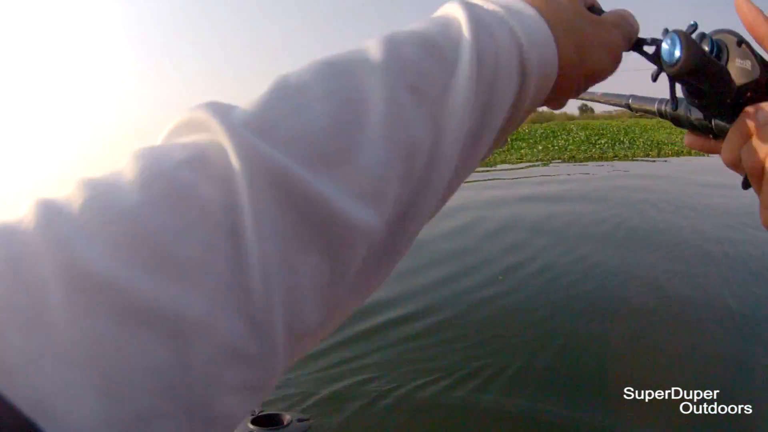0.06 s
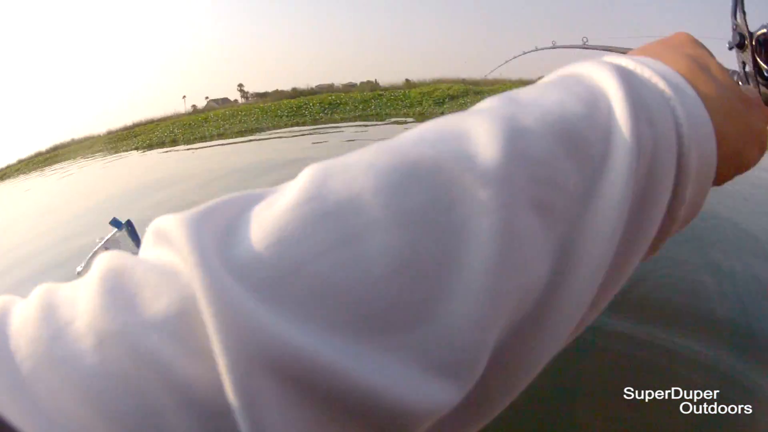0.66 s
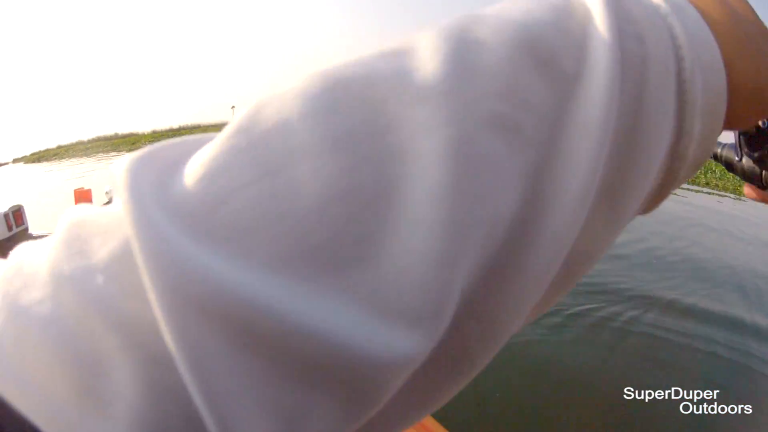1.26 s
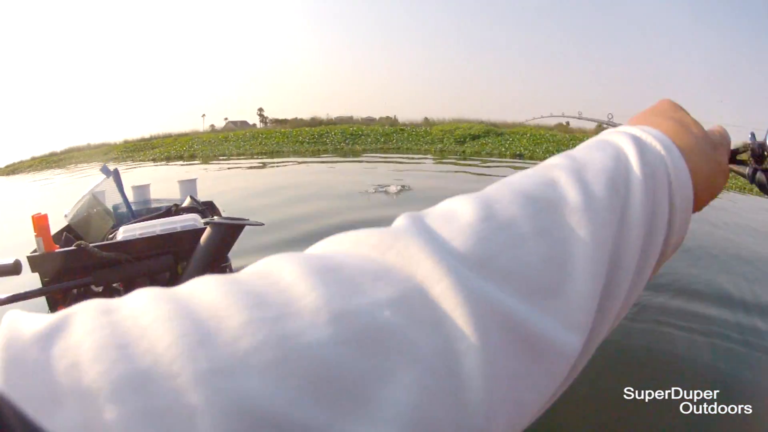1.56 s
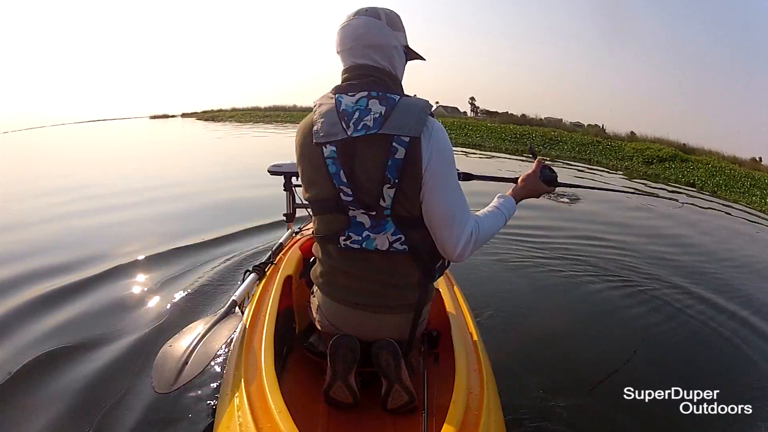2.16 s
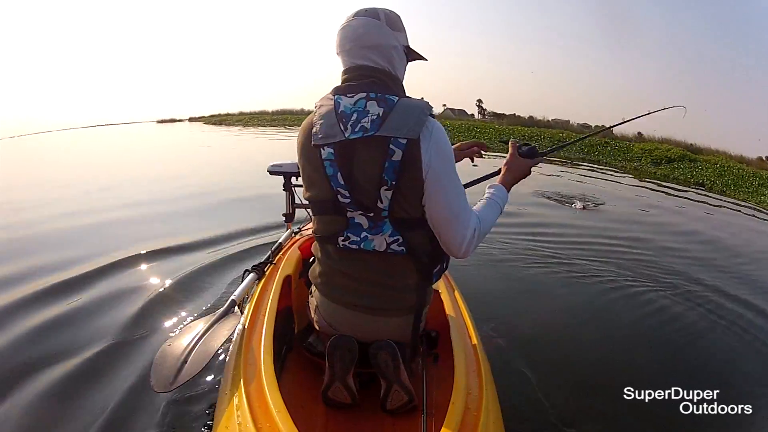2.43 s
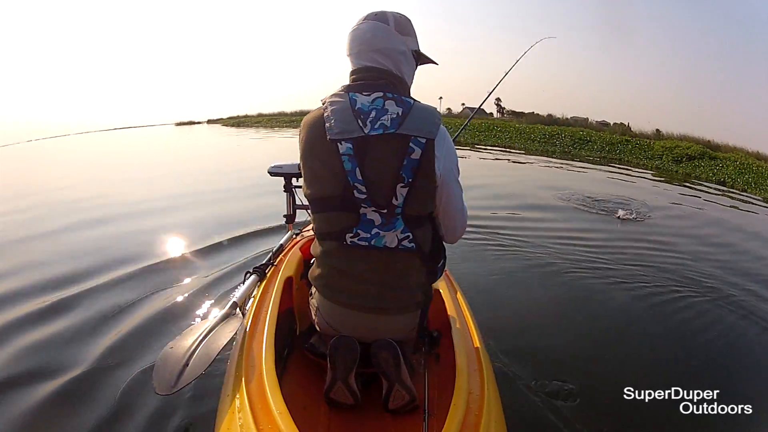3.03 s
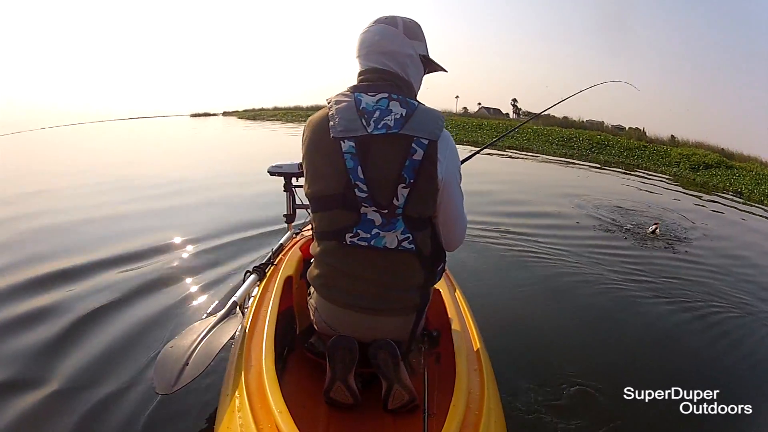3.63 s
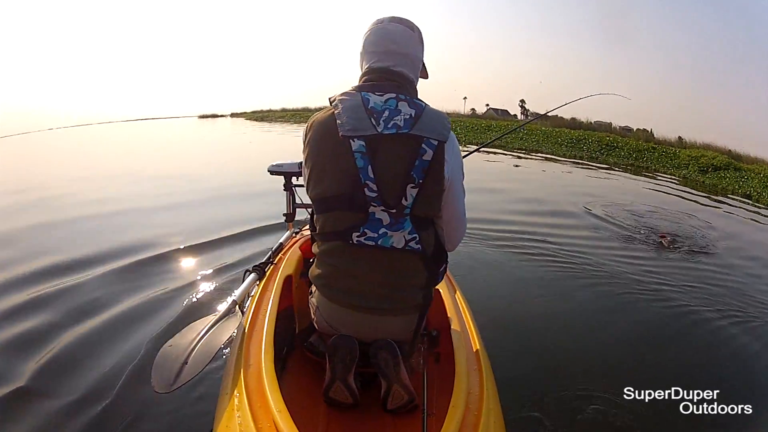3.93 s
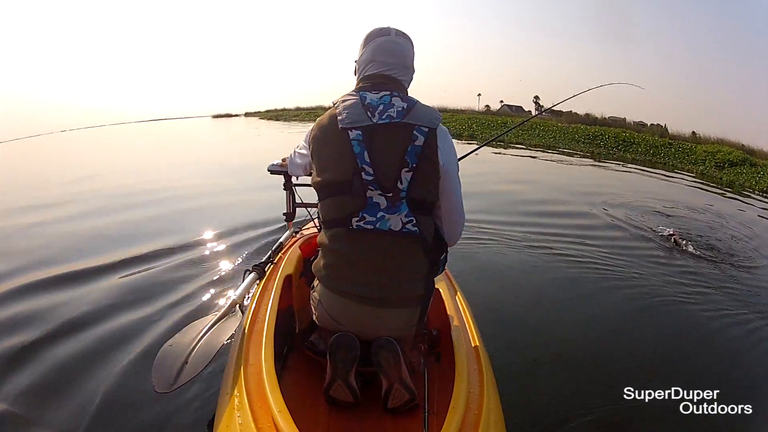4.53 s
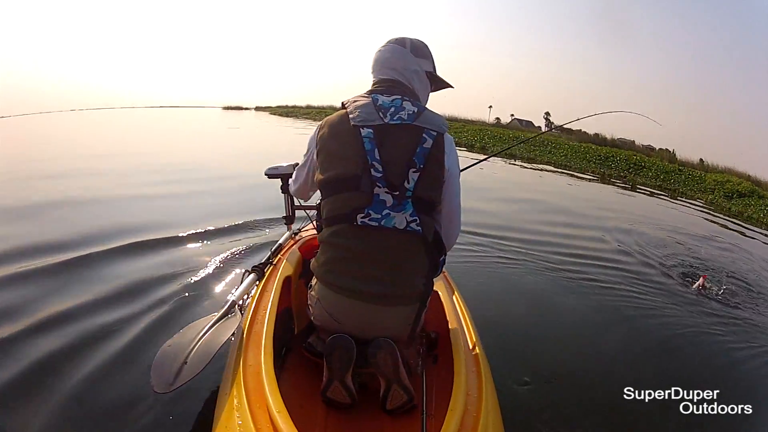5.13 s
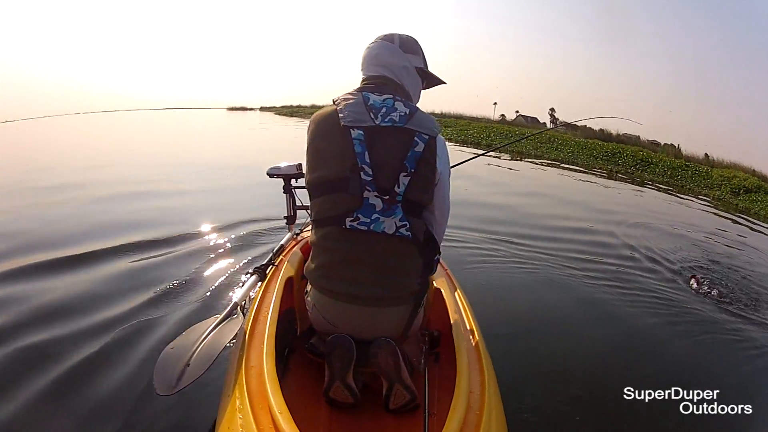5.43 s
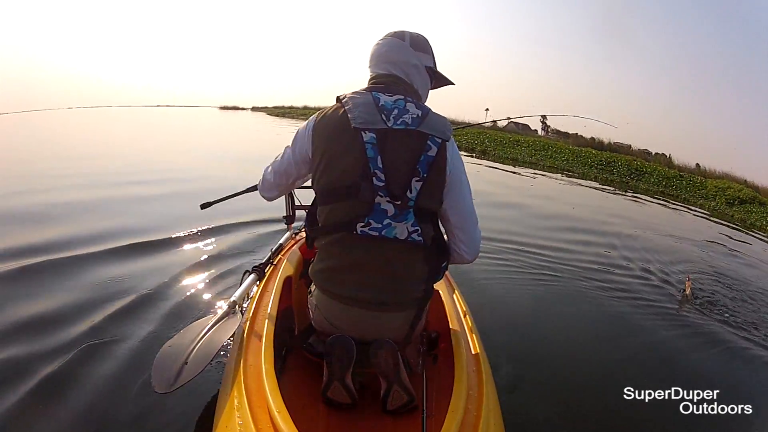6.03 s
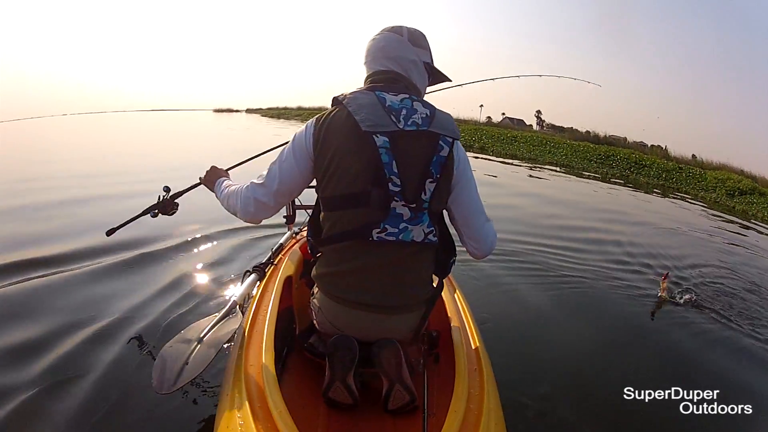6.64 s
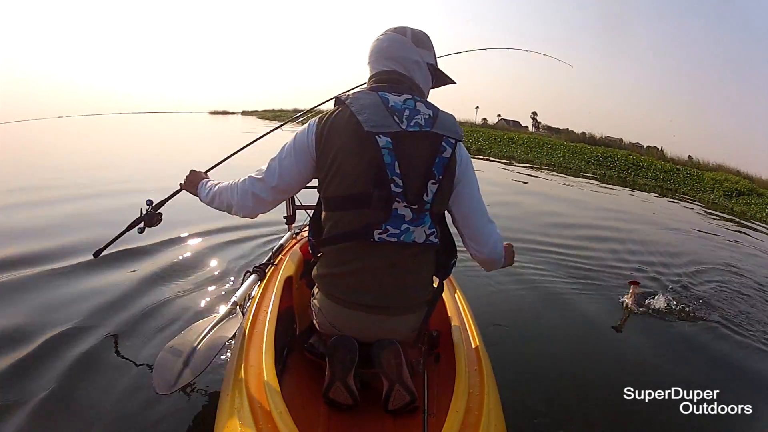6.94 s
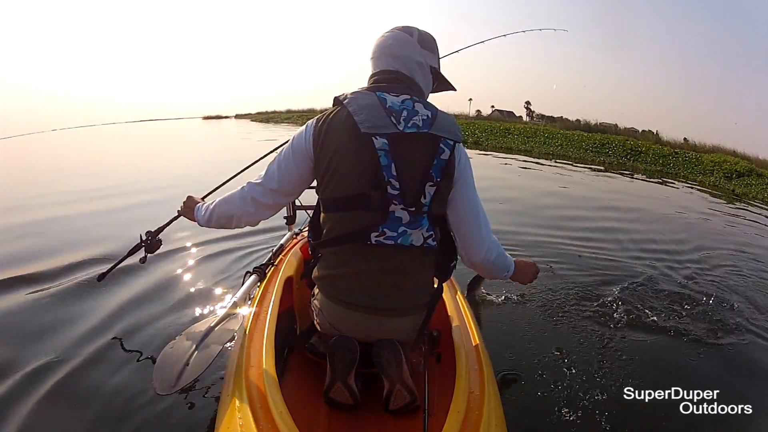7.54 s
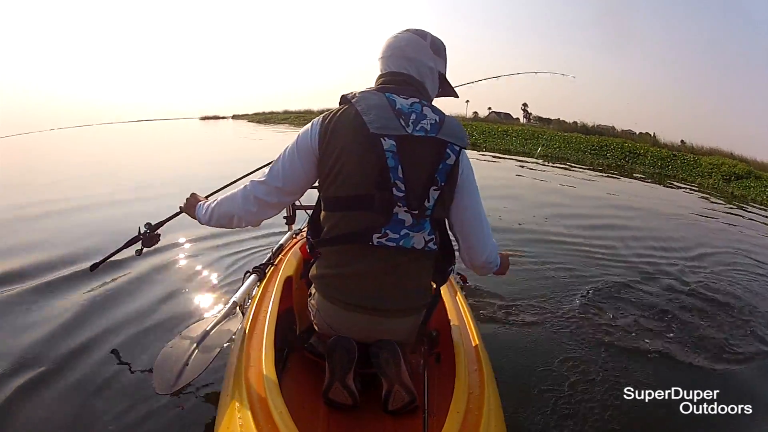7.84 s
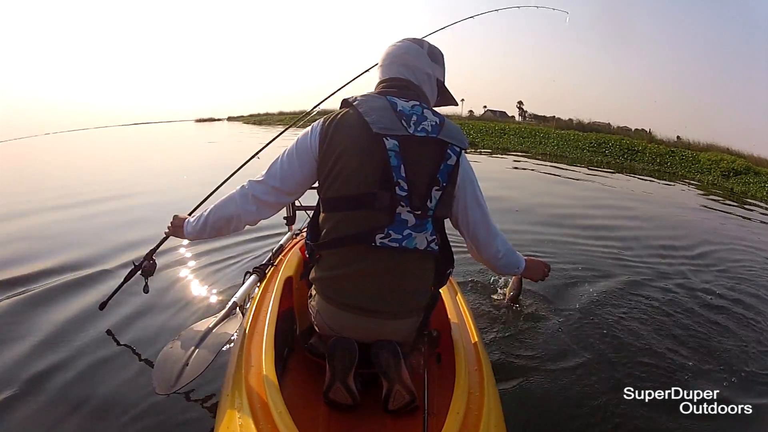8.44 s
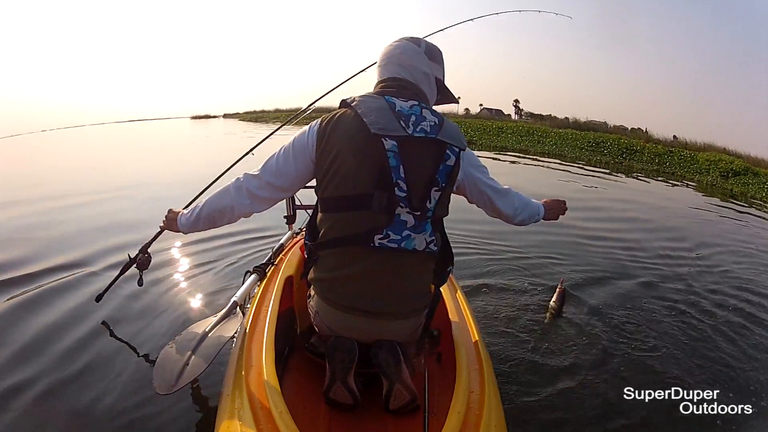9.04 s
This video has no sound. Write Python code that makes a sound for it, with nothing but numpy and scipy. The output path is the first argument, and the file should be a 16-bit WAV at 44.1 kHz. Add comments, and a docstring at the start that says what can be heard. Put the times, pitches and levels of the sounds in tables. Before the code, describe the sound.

A hooked fish splashes and shakes a rattling lure beside a kayak, over gentle lapping and a cranking fishing reel.

```python
"""Calm open water, heard from a camera's microphone on a drifting kayak; no walls, no echo.
Ripples lap under a low rumble of air as an angler cranks the reel and knocks the hull now and then.
From 1.5 s a small hooked fish throws spray and bubbles; from 2.5 s it shakes a bead-filled lure in
bursts while the wet line squeaks. The hull creaks at 6 s. Near 7 s the fish jumps close alongside,
the loudest moment; after 8.5 s little is left but the fading wake, air and the camera's faint tick."""
import sys
import numpy as np
from scipy import signal
from scipy.fft import rfft, irfft
from scipy.io import wavfile
from scipy.ndimage import uniform_filter1d, map_coordinates

SR = 44100
rng = np.random.default_rng(int(sys.argv[2]) if len(sys.argv) > 2 else 0)


def wav_out(sig):
    """Save sig, one row per channel (or a flat mono array), as 16-bit PCM at SR to the path in sys.argv[1]."""
    wavfile.write(sys.argv[1], SR, np.round(np.clip(np.atleast_2d(sig).T, -1, 1) * 32767).astype(np.int16))


N = 409688
TIME = np.arange(N) / SR

# spectra of the open air, the wash on the hull, the reel and the camera's tick: f/Hz, level/dB
AIR_SPECTRUM = [(15, -6.5), (45, 2), (105, 3), (190, -4.5), (400, -14), (900, -22.5), (1600, -22),
                (2300, -16), (3500, -23.5), (7000, -23), (11000, -22), (14000, -22), (14800, -65)]
WASH_SPECTRUM = [(100, 2.5), (220, 4.5), (400, 3.5), (800, -4.5), (1500, -4), (2200, -14.5), (3300, -14),
                 (6000, -19), (11000, -26.5)]
REEL_SPECTRUM = [(300, -2), (900, -8.5), (1900, 1), (2800, -2), (4000, -17), (5300, -2), (7400, -4.5),
                 (8700, 5), (11300, 3), (13000, -1), (15000, -42)]
TICK_SPECTRUM = [(150, -8), (400, -2.5), (900, 1), (1600, -9.5), (2400, -4), (3500, -17), (8000, -23)]
# water stirred by hull and fish, and the kayak's headway that scales it: t/s, level/dB
STIRRED_WATER = [(0.0, -53.5), (4.95, -54), (6.78, -50), (7.09, -46.5), (7.99, -53), (9.29, -50.5)]
HEADWAY = [(5.4, 6), (5.8, -2), (7.8, -2), (8.5, -6)]
# strokes of the reel handle and rod: middle t/s, half width/s, level/dB
CRANK_STROKES = [(0.069, 0.032, -43.5), (.21, 0.022, -48.5), (.47, 0.057, -49), (0.552, 0.023, -43),
                 (.655, 0.02, -48), (.8, 0.082, -51), (.925, 0.031, -44), (.96, 0.0068, -41.5),
                 (1.095, 0.026, -46), (1.195, .04, -50), (1.3, 0.051, -51), (1.43, 0.043, -44.5),
                 (1.53, 0.014, -50), (1.63, 0.016, -44), (1.77, 0.035, -56), (1.85, 0.014, -50.5),
                 (2.242, 0.012, -38)]
# knocks on kayak, rod and reel: t/s, level/dB, centre f/Hz, contact/s
KAYAK_KNOCKS = [(.173, -28, 1270, 0.0055), (0.4386, -21.5, 1370, 0.00036), (.547, -27, 1320, 0.0043),
                (.863, -34, 480, 0.0046), (.891, -28.5, 4600, .004), (.96, -33, 3200, .005),
                (1.065, -36, 2200, 0.0045), (2.233, -28, 2800, 0.0037), (2.296, -30, 259, 0.0031),
                (2.857, -24, 6000, .002), (4.104, -26.5, 850, 0.0048), (5.259, -25.5, 590, 0.0011),
                (5.38, -23.5, 1500, 0.00062)]
# ring of the lure's shell, and the longer ring of its hooks: f/Hz, width/Hz, level/dB
SHELL_MODES = [(4260, 220, -8), (5720, 220, 3.5), (6160, 220, 0.5), (6860, 310, 3.5), (8920, 240, 3.5),
               (10100, 350, 9.5), (11100, 270, 3.5), (11660, 260, 8.5), (12600, 200, -12),
               (13900, 280, -4.5)]
HOOK_RING = [(4224, 85, -8), (5650, 79, -7), (6880, 140, -2)]
# spectra of a bead's dry click and of falling spray: f/Hz, level/dB
BEAD_SPECTRUM = [(1000, -32), (3200, -34.5), (5500, -9), (8000, 0.5), (10000, 9), (12000, 7.5),
                 (13500, -2.5), (15500, -49.5)]
SPRAY_SPECTRUM = [(200, -29), (600, 15), (1200, -3), (2100, 19.5), (3000, 1), (4500, 16), (7000, 10),
                  (11000, 18), (15000, -6)]
# hardest single clacks of lure, hooks and reel: t/s, level/dB, scatter/s
TACKLE_CLACKS = [(0.174, -16, 0.0013), (0.709, -28, 0.00091), (1.515, -24.5, .006), (1.868, -21.5, 0.0053),
                 (2.545, -22, 0.0031), (2.821, -21, 0.0052), (3.092, -18.5, .003), (3.3192, -19, 0.0026),
                 (3.375, -20, 0.0031), (4.187, -25, .003), (4.229, -18, .002), (4.305, -21, 0.0031),
                 (4.6915, -20, 0.0013), (4.823, -20, 0.0046), (5.053, -21.5, 0.0036), (5.115, -27.5, .0008),
                 (6.067, -20.5, 0.0015), (6.4565, -23, 0.0017), (7.002, -6.5, 0.0017),
                 (7.012, -10.5, 0.0015), (7.065, -11, 0.0018), (7.108, -8, 0.0018), (7.119, -6, 0.0016),
                 (7.134, -1.5, 0.0016), (7.1692, -1.5, 0.0027), (7.213, -7, 0.0018), (7.2355, -12, .001),
                 (7.259, -9, 0.002), (7.32, -4, 0.0027), (7.357, -8, 0.00088), (7.399, -4.5, 0.0034),
                 (7.442, -10.5, 0.001), (7.532, -17, .004), (7.68, -12.5, .004), (7.709, -15, .0012),
                 (8.063, -6, 0.0055), (8.115, -14, 0.0011), (8.134, -14, 0.0014), (8.194, -14, 0.0013),
                 (8.288, -15.5, 0.0031), (8.577, -30, 0.0018)]
# hooks, rings and reel parts that clink on one note: t/s, level/dB, f/Hz
METAL_CLINKS = [(0.89, -32.5, 5450), (1.457, -28, 5290), (3.127, -26, 6600), (3.319, -9, 10080),
                (3.342, -18, 9900), (7.709, -26, 4270)]
# the fish beats the water: t/s, length/s, spray level/dB, slosh level/dB, slosh f/Hz
FISH_THRASHES = [(1.469, 0.23, -48, -46.5, 707), (1.66, 0.18, -57.5, -44.5, 517),
                 (2.231, 0.099, -46, -48, 596), (2.719, 0.24, -51.5, -52, 810),
                 (2.948, 0.062, -37.5, -43.5, 870), (3.018, 0.044, -56, -43.5, 905),
                 (3.835, 0.14, -46.5, -51, 670), (4.018, 0.12, -54.5, -54, 510),
                 (4.233, .11, -51, -55, 775), (4.523, 0.016, -37, -60, 510), (4.572, 0.07, -41, -47.5, 890),
                 (4.81, 0.041, -42, -49.5, 890), (5.21, 0.2, -49.5, -53, 597),
                 (6.882, 0.03, -39, -37.5, 870), (6.993, .1, -40.5, -43, 715),
                 (7.106, 0.027, -33.5, -40, 620), (7.164, .003, -28, -30, 660),
                 (7.211, 0.026, -41, -44, 1220), (7.253, 0.27, -44.5, -51.5, 805),
                 (7.508, 0.046, -33.5, -36.5, 730), (7.688, 0.033, -46, -37, 620),
                 (8.017, 0.12, -47.5, -56, 910), (8.204, 0.033, -41, -39, 1180)]
# largest air pockets closing under water: t/s, level/dB, f/Hz, ring before stretching/s
AIR_POCKETS = [(1.561, -26, 885, 0.042), (1.731, -25.5, 480, 0.049), (2.115, -31, 686, .05),
               (3.056, -29, 884, 0.048), (3.51, -34, 440, 0.066), (3.928, -28, 650, 0.03),
               (4.044, -24, 447, 0.034), (4.479, -32.5, 294, 0.08), (4.622, -26.5, 306, 0.052),
               (4.715, -40.5, 1030, 0.12), (4.902, -38.5, 640, 0.19), (5.05, -42, 515, 0.2),
               (5.216, -31.5, 1420, 0.038), (6.596, -29.5, 1430, 0.024), (6.886, -19.5, 597, 0.04),
               (6.937, -30, 760, 0.04), (7.03, -27, 804, 0.038), (7.057, -17.5, 780, 0.026),
               (7.096, -23, 664, 0.032), (7.104, -13.5, 2040, 0.019), (7.166, -17, 594, 0.0207),
               (7.334, -27, 1620, 0.013), (7.44, -28, 735, 0.031), (7.517, -24, 1200, 0.042),
               (7.548, -28, 413, 0.085), (7.615, -29.5, 742, 0.056), (7.698, -22.5, 427, 0.057),
               (7.712, -29, 319, 0.09), (8.236, -31, 600, 0.065)]
# the fish shakes the lure: t/s, length/s, level/dB
HEAD_SHAKES = [(2.54, 0.019, -34.5), (2.57, 0.019, -36.5), (2.755, 0.03, -37), (2.98, 0.015, -28),
               (3.06, 0.013, -33), (3.095, 0.013, -31.5), (3.125, 0.014, -30.5), (3.155, 0.062, -35),
               (3.312, 0.044, -29.5), (3.36, 0.038, -33), (3.415, 0.14, -40), (3.54, 0.033, -34),
               (3.63, 0.043, -42.5), (3.828, 0.015, -32.5), (3.94, .045, -35), (4.215, 0.021, -34.5),
               (4.287, 0.041, -29.5), (4.335, 0.027, -34), (4.42, 0.038, -35), (4.468, 0.027, -31),
               (4.568, 0.0094, -27), (4.72, 0.027, -34), (4.785, 0.06, -35), (4.98, 0.045, -37.5),
               (5.048, 0.026, -38), (5.175, 0.035, -35.5), (5.838, 0.11, -40), (6.025, 0.065, -42),
               (6.39, 0.045, -40), (6.46, 0.039, -37.5), (6.56, 0.017, -36), (6.622, 0.015, -34),
               (6.66, 0.023, -34), (6.72, 0.062, -36), (6.79, .028, -27), (6.874, 0.0099, -22.5),
               (6.928, 0.019, -27.5), (6.993, 0.02, -19), (7.025, 0.078, -29), (7.1, 0.024, -19),
               (7.175, 0.027, -20), (7.214, 0.022, -23), (7.259, 0.02, -20), (7.288, 0.047, -26.5),
               (7.34, 0.048, -25), (7.52, 0.029, -22), (7.66, 0.029, -26.5), (7.71, 0.024, -27),
               (7.752, 0.042, -35.5), (7.89, 0.035, -28.5), (7.994, 0.025, -26), (8.05, 0.032, -27),
               (8.09, 0.051, -30.5), (8.195, 0.055, -31.5), (8.28, 0.027, -32.5)]
# the lure's jiggle between shakes, its freedom to ring out of water, its hooks' swing: t/s, level/dB
LURE_JIGGLE = [(2.3, -93), (2.5, -50), (3.3, -44), (3.8, -46.5), (4.4, -48), (5.15, -47), (5.5, -80),
               (6.3, -52), (6.95, -40.5), (7.25, -26), (7.6, -47), (7.85, -49), (8.28, -36), (8.55, -66)]
LURE_FREEDOM = [(2.5, 4), (5.4, 1), (5.8, 10), (6.8, 4.5), (7.0, -3.5), (7.35, -3), (7.7, 16), (8.0, 4),
                (8.3, 1.5)]
HOOK_LOOSENESS = [(2.5, -14), (6.5, -11.5), (7.15, -19), (7.68, -8.5), (7.73, 2), (7.95, -15), (8.35, -3)]
# squeaks of the wet line: t/s, length/s, start f/Hz, end f/Hz, level/dB
LINE_SQUEAKS = [(2.803, 0.028, 5700, 5120, -36.5), (3.961, 0.03, 5100, 5300, -36.5),
                (4.035, 0.035, 5400, 5530, -41), (4.517, 0.025, 6030, 4880, -37.5),
                (4.705, 0.051, 5580, 5120, -43), (4.818, 0.021, 5270, 4440, -36.5)]
# flat slaps of the fish on the water: t/s, level/dB, centre f/Hz, contact/s
FISH_SLAPS = [(4.224, -26.5, 3000, 0.002), (4.691, -23, 3380, 0.0037), (7.1685, -16.5, 1300, 0.00088),
              (8.208, -19, 5200, 0.0014), (8.229, -25.5, 1820, 0.0016)]


def undb(db):
    """Decibels to gain."""
    return 10 ** (np.asarray(db) / 20)


def unit(x):
    """Scale to rms 1."""
    return x / np.sqrt(np.mean(x ** 2))


def curve(rows):
    """Gain over time from rows of t/s, level/dB."""
    return undb(np.interp(TIME, *np.transpose(rows)))


def add(out, s, sound):
    """Mix a sound in at time s."""
    start = int(s * SR)
    part = sound[max(-start, 0):N - start]
    out[max(start, 0):][:len(part)] += part


def response(points, size=2048):
    """Minimum-phase, unit-energy impulse response of a spectrum, rolled off above its last point."""
    hz, db = np.transpose(points)
    bins = np.maximum(np.arange(size // 2 + 1) * SR / size, 1)
    roll_off = np.minimum(hz[-1] / bins, 1) ** 4
    gain = undb(np.interp(np.log(bins), np.log(hz), db)) * roll_off
    cepstrum = irfft(np.log(gain))
    cepstrum[1:size // 2] *= 2
    cepstrum[size // 2 + 1:] = 0
    ring = irfft(np.exp(rfft(cepstrum)))
    return ring / np.linalg.norm(ring)


def through(x, ring):
    """Pass a sound through an impulse response."""
    return signal.oaconvolve(x, ring)[:N]


def resonate(x, hz, width_hz):
    """Ring one mode, which gives out the power of the clicks that strike it."""
    return np.sqrt(SR / np.pi / width_hz) * signal.lfilter(*signal.iirpeak(hz, hz / width_hz, SR), x)


def walk(rate):
    """Random wander of rms 1 that takes `rate` new values a second."""
    hold = int(SR / rate)
    steps = np.repeat(rng.standard_normal(N // hold + 1), hold)
    return unit(uniform_filter1d(steps, hold)[:N])


def flutter(rate, depth_db, even_s=0.055):
    """Quick uneven surges that share a steady power over even_s."""
    surge = undb(depth_db * np.clip(walk(rate), -2, 2))
    return surge / np.sqrt(uniform_filter1d(surge ** 2, int(even_s * SR)))


def impacts(rate, spread_db, even_s):
    """Random clicks, a few large among many small, sharing a steady power over even_s."""
    size = undb(spread_db * np.minimum(rng.exponential(size=N), 5))
    clicks = (rng.random(N) < rate / SR) * size * rng.choice([-1, 1], N)
    power = uniform_filter1d(clicks ** 2, int(even_s * SR))
    return clicks / np.sqrt(np.maximum(power, rate / SR / 2))


def bouts(rows, attack_s, release_s, lead_s, tail_db, tail_s):
    """Gain from rows of t/s, length/s, level/dB: quick bursts on a weak skirt that leads and trails."""
    power = np.zeros(N)
    t = np.arange(-SR // 4, SR) / SR
    for s, length, db in rows:
        before, after = np.maximum(-t, 0), np.maximum(t - length, 0)
        # the briefest bouts have the sharpest edges
        body = np.exp(-before / min(attack_s, length / 2) - after / min(release_s, length))
        skirt = undb(tail_db) * np.exp(-before / min(lead_s, length) - after / tail_s)
        add(power, s + t[0], (undb(db) * np.maximum(body, skirt)) ** 2)
    return np.sqrt(power)


def air(level_db):
    """Open air all round the microphone: a low rumble under a faint even hiss."""
    return undb(level_db) * through(rng.standard_normal(N), response(AIR_SPECTRUM, size=8192))


def bubble(hz, ring_s, rise, pinch_cycles=2.2):
    """Air pinches off, rings down 60 dB and glides by the fraction `rise` as it nears the surface."""
    t = np.arange(int(ring_s * SR)) / SR
    age = t / ring_s
    onset = 1 - np.exp(-hz * t / pinch_cycles)
    decay = np.exp(-np.log(1000) * age ** 0.95)
    return onset * decay * np.sin(2 * np.pi * hz * t * (1 + rise * age / 2))


def froth(rate, low_hz, high_hz, cycles, spread_db, rise, count=1900):
    """A steady swarm of small bubbles of all sizes, `rate` a second."""
    out = np.zeros(N)
    pitches = low_hz * (high_hz / low_hz) ** rng.random(count)
    kinds = [bubble(hz, cycles * (.5 + rng.random()) / hz, rise) for hz in pitches]
    when, size = rng.random((int(rate * N / SR), 2)).T
    for k, gain in enumerate(undb(spread_db * size ** 2)):
        add(out, when[k] * TIME[-1], gain * kinds[k % count])
    return unit(out)


def wake(wash_db, gurgle_db):
    """Ripples wash and gurgle close along the hull, and settle as the kayak loses way."""
    wash = through(rng.standard_normal(N), response(WASH_SPECTRUM)) * undb(2.4 * walk(25))
    gurgle = froth(rate=300, low_hz=340, high_hz=2200, cycles=15, spread_db=8, rise=0.2)
    return curve(HEADWAY) * curve(STIRRED_WATER) * (undb(wash_db) * wash + undb(gurgle_db) * gurgle)


def reel(gain_db):
    """Gear teeth, sleeve and wet line rub finely, swelling unevenly with every turn of the handle."""
    rub = through(impacts(rate=12000, spread_db=2.5, even_s=.05), response(REEL_SPECTRUM))
    strokes = (undb(db) * np.exp(-((TIME - s) / half_s) ** 2 / 2) for s, half_s, db in CRANK_STROKES)
    swell = np.sqrt(sum(stroke ** 2 for stroke in strokes))
    return undb(gain_db) * rub * swell * flutter(rate=70, depth_db=3.5)


def camera_ticks(level_db, first_s, rate_hz):
    """Right by the microphone, the camera's electronics tick faintly and evenly."""
    ticks = np.zeros(N)
    ticks[(np.arange(first_s, TIME[-1], 1 / rate_hz) * SR).astype(int)] = 1
    return undb(level_db) * unit(through(ticks, response(TICK_SPECTRUM)))


def blows(rows, gain_db):
    """Short dead blows on plastic or water, each with its own centre pitch and contact time."""
    out = np.zeros(N)
    t = np.arange(SR // 20) / SR
    for s, db, hz, contact_s in rows:
        contact = 0.2 * rng.standard_normal(len(t)) * np.exp(-t / contact_s)
        contact[0] = 1
        body = response([(hz / 4.5, -20), (hz / 1.95, 0), (hz * 1.5, 0), (hz * 3.5, -19), (hz * 12, -40)])
        blow = signal.fftconvolve(contact, body)
        add(out, s, undb(db + gain_db) * blow / np.abs(blow).max())
    return out


def bead_strike(click_db, detune):
    """One bead striking the lure: a dry click and the short ring of the shell."""
    t = np.arange(1024) / SR
    ring = 0
    for hz, width, db in SHELL_MODES:
        phase = 2 * np.pi * (hz * (1 + detune * rng.standard_normal()) * t + rng.random())
        ring += undb(db) * width * np.exp(-np.pi * width * t) * np.sin(phase)
    strike = ring / np.linalg.norm(ring) + undb(click_db) * response(BEAD_SPECTRUM, size=1024)
    return strike / np.linalg.norm(strike)


def clacks(gain_db):
    """Hard bits of tackle strike together, their hits crowding into a few milliseconds."""
    out = np.zeros(N)
    t = np.arange(-SR // 100, SR // 30) / SR
    for s, db, scatter_s in TACKLE_CLACKS:
        crowding = np.exp(-np.abs(t) / np.where(t > 0, scatter_s, 0.5 * scatter_s))
        hits = rng.standard_normal(len(t)) * crowding
        clack = signal.fftconvolve(hits, bead_strike(click_db=5.5, detune=0.01))
        add(out, s + t[0], undb(db + gain_db) * clack / np.abs(clack).max())
    return out


def clinks(gain_db, width_hz, chatter_s):
    """A small metal part chatters for an instant and rings on its own note."""
    out = np.zeros(N)
    t = np.arange(SR // 20) / SR
    for s, db, hz in METAL_CLINKS:
        chatter = rng.standard_normal(len(t)) * np.exp(-t / chatter_s)
        clink = resonate(chatter, hz, width_hz)
        add(out, s, undb(db + gain_db) * clink / np.abs(clink).max())
    return out


def splashes(drops_db, froth_db):
    """Water thrown by the fish falls back as crackling drops and leaves a froth of bubbles."""
    drops = through(impacts(rate=6000, spread_db=3, even_s=0.015), response(SPRAY_SPECTRUM))
    foam = froth(rate=650, low_hz=1300, high_hz=7500, cycles=40, spread_db=15, rise=.1)
    throws = [row[:3] for row in FISH_THRASHES]
    thrown = bouts(throws, attack_s=0.01, release_s=0.0094, lead_s=0.056, tail_db=-9.0, tail_s=0.084)
    return (undb(drops_db) * drops + undb(froth_db) * foam) * thrown * flutter(rate=62, depth_db=2.6)


def sloshes(gain_db, bubbles_per_s, spread_octaves, spread_db, cycles):
    """Every beat of the fish traps a cluster of middle-sized bubbles, scattered around one size."""
    out = np.zeros(N)
    chances = rng.random((len(FISH_THRASHES), 200, 4))
    for (s, length, _, db, hz), chance in zip(FISH_THRASHES, chances):
        count = int(bubbles_per_s * length) + 3
        cluster = np.zeros(N)
        for k, (delay, high, low, size) in enumerate(chance[:count]):
            pitch = hz * 2 ** (spread_octaves * np.sqrt(6) * (high - low))
            trapped = undb(spread_db * size) * bubble(pitch, cycles / pitch, rise=.14)
            add(cluster, length * (k + delay) / count, trapped)
        add(out, s, undb(db + gain_db) * cluster * np.sqrt(length * SR / np.sum(cluster ** 2)))
    return out


def plops(gain_db, small_db, stretch, count=3):
    """Each large air pocket rings under the surface and sheds a few smaller bubbles."""
    out = np.zeros(N)
    for s, db, hz, ring_s in AIR_POCKETS:
        # deep, long-ringing pockets glide furthest
        add(out, s, undb(db + gain_db) * bubble(hz, stretch * ring_s, rise=50 * ring_s ** 2))
        for k, (delay, pitch) in enumerate(rng.random((count, 2))):
            small = bubble(0.654 * hz * 3.4 ** ((k + pitch) / count), .5 * ring_s, rise=.14)
            add(out, s + .35 * ring_s * delay, undb(db + small_db) * small)
    return out


def shell_ring(beads, freedom, drift):
    """The lure's shell rings; each bead lands on a new spot and weights the modes differently."""
    hit = np.flatnonzero(beads)
    ring = 0
    for hz, width, db in SHELL_MODES:
        strikes = np.zeros(N)
        strikes[hit] = beads[hit] * (1 + rng.standard_normal(len(hit))) * undb(4 * walk(35)[hit])
        ring += undb(db) * unit(resonate(strikes, hz, width))
    # water washing over the shell loads it and bends its pitch
    bend = np.cumsum(drift * walk(22) / (1 + freedom ** 2))
    return unit(map_coordinates(ring, [np.arange(N) + bend], order=4, mode="mirror"))


def rattle(gain_db, click_db, ping_db):
    """Beads tumble in the lure as the fish shakes its head; flicked droplets ping and hooks ring on."""
    beads = impacts(rate=1400, spread_db=4, even_s=.01)
    freedom = curve(LURE_FREEDOM)
    ring = freedom * shell_ring(beads, freedom, drift=.05)
    click = response(BEAD_SPECTRUM)
    clicks = undb(click_db) * through(beads, click)
    droplets = sum(froth(rate=220, low_hz=4000, high_hz=13000, cycles=260, spread_db=13, rise=rise)
                   for rise in (-.07, .05))
    pings = undb(ping_db) * unit(through(droplets, click))
    lure = (ring + clicks + pings) / np.sqrt(1 + freedom ** 2)
    shake = bouts(HEAD_SHAKES, attack_s=.0062, release_s=.0067, lead_s=.025, tail_db=-16.5, tail_s=.053)
    drive = undb(gain_db) * np.hypot(shake, curve(LURE_JIGGLE))
    drive *= flutter(rate=130, depth_db=3.1, even_s=0.028)
    # the hooks jingle most while they swing clear of the water
    jolts = beads * drive * curve(HOOK_LOOSENESS)
    hooks = sum(undb(db) * resonate(jolts * undb(4 * walk(18) - 3), hz, width)
                for hz, width, db in HOOK_RING)
    return lure * drive + hooks


def squeaks(gain_db, octave_db, rough):
    """The wet line sticks and slips in short, hoarse, mostly falling chirps."""
    out = np.zeros(N)
    jitter = 1 + rough * walk(2500) + 0.0096 * walk(150)
    for s, length, start_hz, end_hz, db in LINE_SQUEAKS:
        age = np.linspace(0, 1, int(length * SR))
        hz = (start_hz + (end_hz - start_hz) * age) * jitter[int(s * SR):][:len(age)]
        phase = 2 * np.pi * np.cumsum(hz) / SR
        tone = np.sin(phase) + undb(octave_db) * np.sin(2 * phase)
        add(out, s, undb(db + gain_db) * unit(np.sin(np.pi * age) * tone))
    return out


def creak(start_s, length_s, slips_hz, body_hz, gain_db):
    """The hull creaks under a shift of weight: a short run of slips, each a dull tick."""
    slips = np.zeros(N)
    for k, chance in enumerate(rng.random(round(length_s * slips_hz))):
        s = start_s + (k + chance * .7) / slips_hz
        swell = np.sin(np.pi * (k + 1) / (length_s * slips_hz + 2))
        slips[int(s * SR)] = undb(gain_db) * (1 + chance) * swell
    hull = response([(body_hz / 2, -20), (body_hz, 0), (body_hz * 2, -15), (body_hz * 4, -33)])
    return through(slips, hull)


def scene():
    """Kayak, tackle and fish as they reach one microphone on board, with no echo."""
    mix = air(level_db=-51.5)
    mix += wake(wash_db=-5, gurgle_db=-8.5)
    mix += reel(gain_db=1.8)
    mix += camera_ticks(level_db=-62, first_s=.0158, rate_hz=29.97)
    mix += blows(KAYAK_KNOCKS, gain_db=-0.1)
    mix += clacks(gain_db=0.5)
    mix += clinks(gain_db=-1.5, width_hz=150, chatter_s=0.0062)
    mix += splashes(drops_db=-2, froth_db=-5.0)
    mix += sloshes(gain_db=-2.0, bubbles_per_s=300, spread_octaves=0.37, spread_db=16, cycles=9.7)
    mix += plops(gain_db=4.5, small_db=-3.5, stretch=0.73)
    mix += rattle(gain_db=-3.5, click_db=0.5, ping_db=1.3)
    mix += squeaks(gain_db=-1.0, octave_db=-3.0, rough=0.055)
    mix += blows(FISH_SLAPS, gain_db=0.0)
    mix += creak(start_s=5.975, length_s=0.098, slips_hz=75.3, body_hz=422, gain_db=-19.0)
    return mix[None]


def record(dry):
    """The camera cuts the treble above 15.4 kHz."""
    return signal.sosfilt(signal.ellip(8, .2, 70, 15400, fs=SR, output="sos"), dry)


dry = scene()
out = record(dry)
wav_out(out)
```